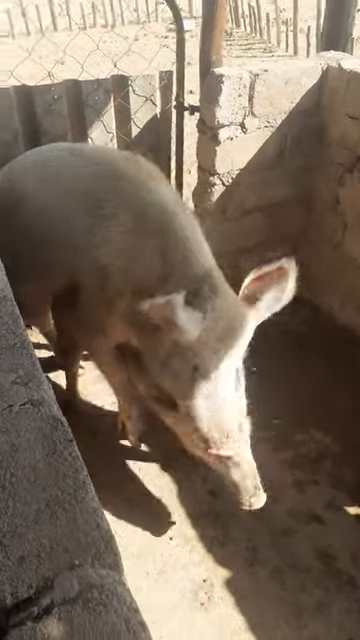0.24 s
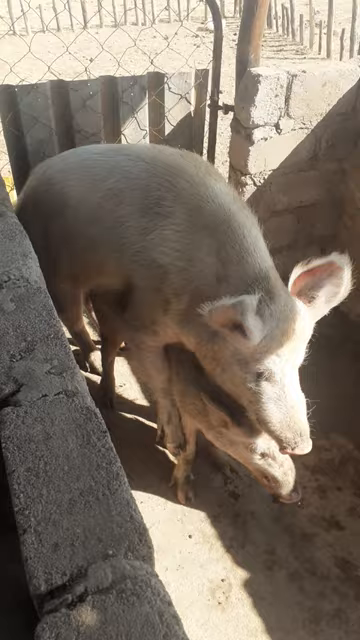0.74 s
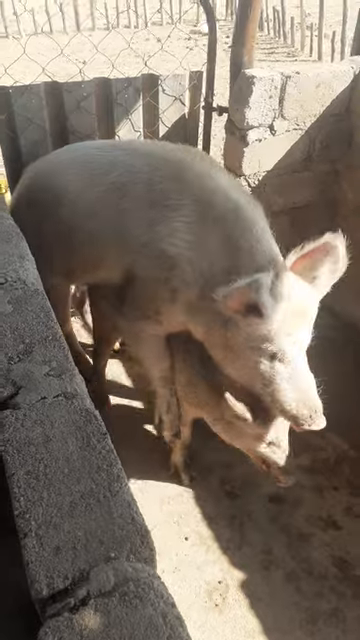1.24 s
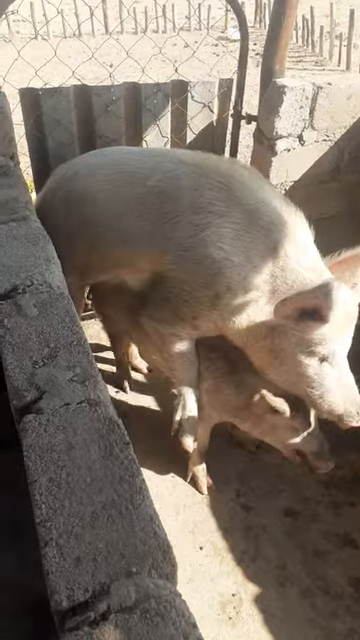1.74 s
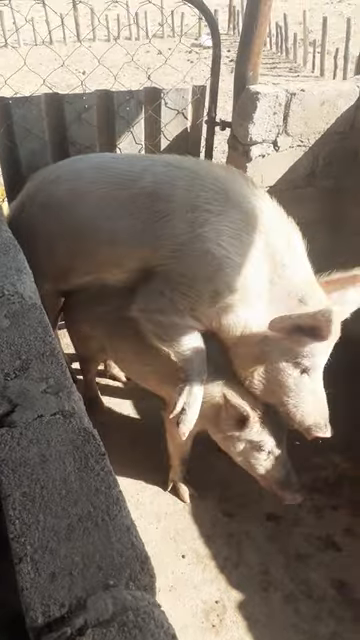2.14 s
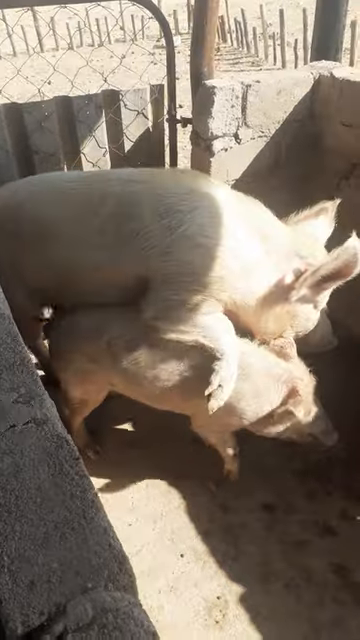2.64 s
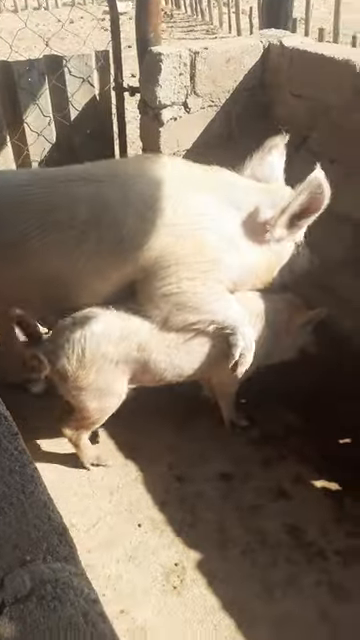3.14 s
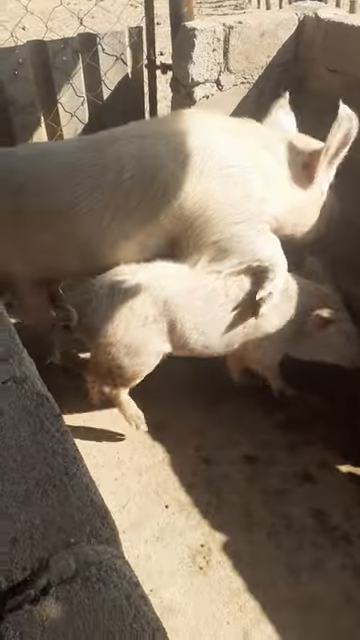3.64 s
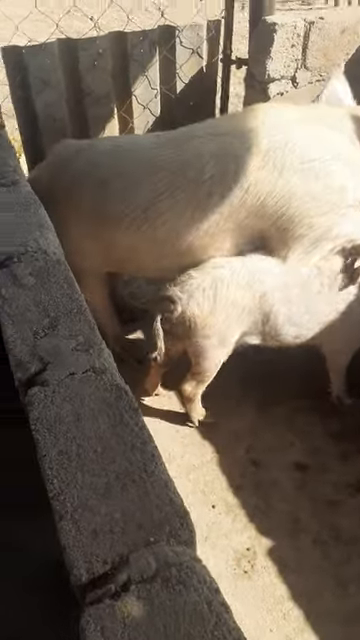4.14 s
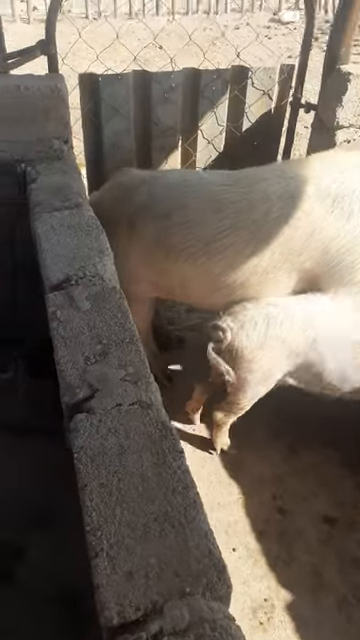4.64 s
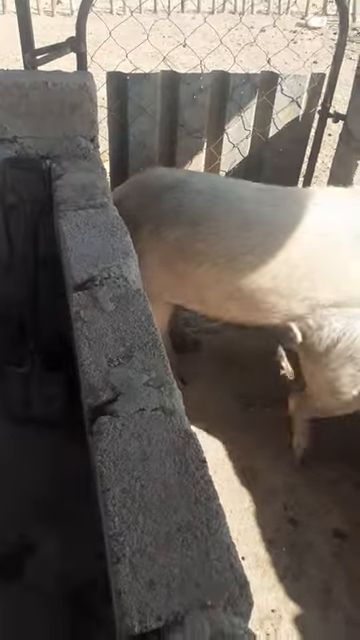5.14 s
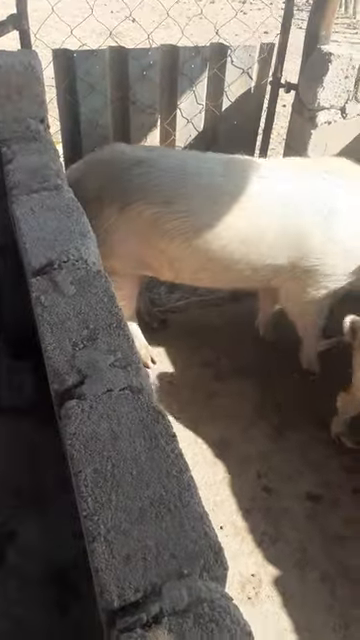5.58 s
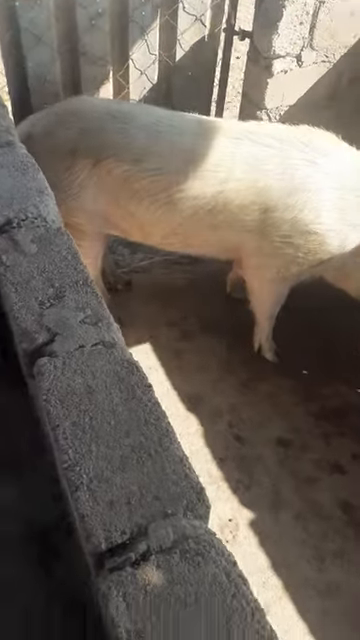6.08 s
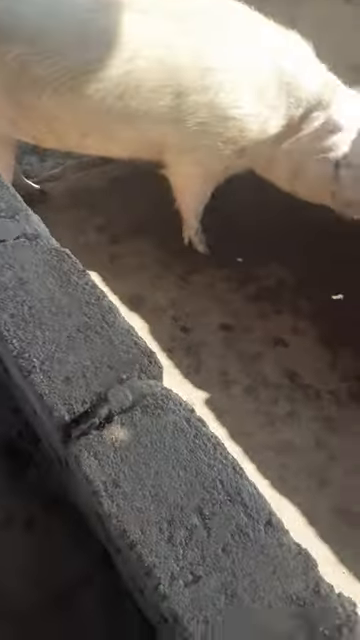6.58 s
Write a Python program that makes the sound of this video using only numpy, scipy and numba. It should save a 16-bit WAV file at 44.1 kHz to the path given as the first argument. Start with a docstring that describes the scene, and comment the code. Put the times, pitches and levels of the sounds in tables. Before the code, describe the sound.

A young pig growls and screams twice, harsh and shrill, in a concrete pen, then gives quiet low grunts and scrapes its trotters.

```python
"""Pig squabble in a pen

A young pig, pinned under a big one in a concrete pen, growls, screams twice and grunts as it gets free.
The screams are rough vocal-fold pulses plus a shrill second oscillator, shaped by a moving throat.
Grunts are slow slaps that ring snout and chest; snorts are noise through one snout resonance.
Trotters scrape and tap on the gritty floor; close walls throw it all back at a phone, over quiet air."""
import sys
import numpy as np
from scipy import signal
from scipy.fft import rfft, irfft, next_fast_len
from scipy.io import wavfile
from scipy.ndimage import uniform_filter1d, minimum_filter1d
from numba import njit

SR = 44100
rng = np.random.default_rng(int(sys.argv[2]) if len(sys.argv) > 2 else 0)


def int16_out(signal):
    """Quantize to a 16-bit WAV file."""
    q = np.round(np.clip(np.atleast_2d(signal).T, -1, 1) * 32767)
    wavfile.write(sys.argv[1], SR, q.astype(np.int16))


N = 300457
T = np.arange(N) / SR  # time of each sample, s


def undb(db):
    """Turn decibels into a gain."""
    return 10 ** (np.asarray(db) / 20)


def unit(x):
    """Scale to an rms of 1."""
    return x / np.sqrt(np.mean(x ** 2) + 1e-18)


def steady(x):
    """Even out slow swells, keeping the fast grain."""
    return x / np.sqrt(np.abs(uniform_filter1d(x ** 2, size=2600)) + 1e-12)


def curves(rows):
    """Join the columns of a table by straight lines in time."""
    start_s, *columns = np.transpose(rows)
    return [np.interp(T, start_s, column) for column in columns]


def envelope(start, end, rise_s, fall_s):
    """Swell up to the start, hold to the end, die away."""
    return np.exp(np.minimum(T - start, 0) / rise_s - np.maximum(T - end, 0) / fall_s)


def noise():
    """White noise."""
    return rng.standard_normal(N)


def walk(rate):
    """Random wander that picks a new target so many times a second."""
    return np.interp(T * rate, np.arange(N), noise())


def colour(x, points):
    """Shape the spectrum by a table of (pitch_hz, level_db)."""
    hz, db = np.transpose(points)
    size = next_fast_len(N + SR // 10)
    f = np.arange(size // 2 + 1) * SR / size
    gain = undb(np.interp(np.log(f + 1), np.log(hz), db))
    return irfft(rfft(x, size) * gain, size)[..., :N]


@njit
def svf(x, g, k):
    """State-variable band-pass: two leaky stores that pass energy to and fro."""
    y, b, l = np.empty(len(x)), 0., 0.
    for i in range(len(x)):
        v = (b + g[i] * (x[i] + 1e-18 - l)) / (1 + g[i] * (g[i] + k[i]))
        b, l, y[i] = 2 * v - b, l + 2 * g[i] * v, k[i] * v
    return y


def ring(x, hz, width):
    """A resonance whose centre may move."""
    hz = np.minimum(hz + np.zeros(len(x)), SR / 2 - 2000)
    return svf(x, np.tan(np.pi * hz / SR), width / hz)


def ring_twice(x, hz, width):
    """The same resonance passed twice, for steeper sides."""
    return ring(ring(x, hz, width), hz, width)


# Colour of the quiet outdoor air: (pitch_hz, level_db)
AIR = [(24, -38), (40, 3), (320, 8), (516, -10), (1270, -3.5), (4570, -12), (7540, -8), (16000, -76.5)]
AIR_DB = -64


def outdoor_air():
    """Coloured noise, partly shared by both channels, whose level drifts gently."""
    both_channels = noise() + 0.68 * np.array([noise(), noise()])
    return unit(colour(both_channels, AIR)) * undb(AIR_DB + 1.4 * walk(1.2))


# How wide the mouth is held: (time_s, mouth_resonance_hz)
MOUTH = [(0, 1640), (.19, 1543), (.37, 2100), (.48, 1890), (.6, 2064), (.8, 2123), (1.0, 1940), (1.1, 1859),
         (1.2, 1993), (1.66, 2100), (1.87, 1729), (2.13, 1498), (2.33, 1931), (2.55, 1611), (2.93, 1625),
         (3.17, 1826), (3.26, 1748), (3.33, 1480)]
NARROW_HZ, WIDE_HZ = 1532, 2100  # mouth resonance in a growl and in a full scream
# The wider the mouth, the louder, thinner, brighter and clearer the voice: (in a growl, in a full scream)
LOUDNESS_DB, BASS_DB, TREBLE_DB, ROUGHNESS = (-3, 5), (-8.5, -17), (-11.5, -8.5), (.74, 0.171)


def follow(ends):
    """A quality of the voice, between its values for a narrow and a wide mouth."""
    mouth_hz, = curves(MOUTH)
    return np.interp(mouth_hz, [NARROW_HZ, WIDE_HZ], ends)


# An opening growl and two screams, with settings added to those that follow the mouth:
# (start_s, end_s, level_db halfway, swell_db_per_s, bass_db, treble_db, roughness_0_to_1, open_throat_db)
SCREAMS = [(0, 0.23, -15.5, 4, 7.5, 1.5, 0.42, -3.5), (0.236, 1.847, -13.5, -1, -2, 4, 0.06, -40),
           (2.194, 3.27, -9.5, 2, -3, 2.5, 0, -19.5)]
ATTACK_S, RELEASE_S = 0.035, 0.035
# The voice breaks up: (centre_s, spread_s, level_change_db, added_roughness_0_to_1)
BREAKS = [(0.239, 0.019, 6.5, 0.23), (0.487, 0.042, -1.5, 0.54), (1.098, 0.066, -0.5, 0.3),
          (1.26, .025, -0.5, .5), (1.501, .025, 3, 0.38), (1.802, .04, 4.5, 0.12), (2.554, 0.028, -8.5, .2),
          (2.709, 0.063, -8.5, 0), (3.227, 0.071, -1, 0.2)]


def push():
    """Each cry's effort rises, holds and lets go, bringing its own tone; breaks jolt level and roughness."""
    gains = []
    for start, end, db, swell, *_ in SCREAMS:
        level_db = db + swell * (np.clip(T, start, end) - (start + end) / 2)
        gains.append(undb(level_db) * envelope(start, end, ATTACK_S, RELEASE_S))
    gains = np.array(gains)
    jolt_db, rasp = sum(np.outer([db, rough], np.exp(-((T - s) / spread) ** 2))
                        for s, spread, db, rough in BREAKS)
    # the strongest cry sets the tone
    tone = np.array(SCREAMS)[gains.argmax(axis=0), 4:].T
    bass_db, treble_db, hoarse, throat_db = (uniform_filter1d(c, size=900) for c in tone)
    effort = gains.max(axis=0) * undb(follow(LOUDNESS_DB) + jolt_db)
    return effort, bass_db, treble_db, hoarse + rasp, throat_db


# Centre line of the vocal folds' pitch: (time_s, strong_weak_pulse_pair_rate_hz)
PITCH = [(.28, 245.3), (.34, 233.5), (.45, 231.4), (.54, 222.5), (.65, 234.8), (.71, 233), (.74, 266.5),
         (1.0, 239.9), (1.1, 221.3), (1.15, 229.1), (1.19, 250), (1.31, 248.8), (1.47, 260), (1.53, 314),
         (1.56, 322), (1.6, 353.6), (1.65, 314.9), (1.72, 345.8), (1.77, 301), (1.88, 268.7), (2.19, 257.9),
         (2.29, 299.8), (2.5, 276.3), (2.62, 251.7), (2.75, 270.3), (3.03, 252.5), (3.22, 304.5),
         (3.33, 270)]
# The weak pulse catches up as the pitch climbs: (pair_rate_hz, shortfall_0_to_1)
SHORTFALL = [(270, 0.89), (320, 0.1)]


def folds(hoarse, jitter=0.03013, lurch=.055, rasp=1.78, tremor=.005, triplets=0.9):
    """Strong and weak pulses in turn; roughness makes pitch lurch, cycles break up and turbulence join in."""
    pair_hz, = curves(PITCH)
    rough = np.clip(follow(ROUGHNESS) + hoarse, 0, 1)
    shortfall = np.clip(np.interp(pair_hz, *np.transpose(SHORTFALL)), 0, 1)
    unsteadiness = tremor * walk(40) + rough * (jitter * walk(400) + lurch * walk(45))
    pulse_hz = 2 * pair_hz * (1 + unsteadiness)
    phase = np.cumsum(pulse_hz) / SR
    cycle = np.round(phase).astype(int)
    offset = (phase - cycle) * SR / pulse_hz  # samples from the nearest closure
    pulses = np.sinc(offset) * np.exp(-(offset / 4) ** 2)
    pulses *= 1 - shortfall * (cycle % 2)
    pulses *= undb(6 * rough * np.tanh(noise()[cycle]))  # a random level for each cycle
    # strained folds slip in and out of beating in threes
    pulses *= 1 + triplets * np.sqrt(rough) * walk(16) * np.cos(2 * np.pi * cycle / 3)
    turbulence = noise() * (1 + np.cos(2 * np.pi * phase))
    return steady(pulses) + rasp * rough ** 2 * steady(turbulence), phase, rough


# Upper throat resonances: (multiple_of_mouth_resonance, width_hz of each of two passes, level_db)
UPPER = [(1.95, 667, 6.5), (2.401, 617, 5), (2.998, 1014, 3.5), (4.0, 1255, -4)]
QUIVER = .035  # how much the mouth trembles in a scream, as a share of its resonance


def screams(mouth_db=-1, leak_db=-14, leak_rough_db=-10, mouth_width_hz=620, spread=1.05):
    """The folds drive low resonances and a stack of high ones that rise as the mouth opens."""
    mouth_hz, = curves(MOUTH)
    effort, bass_db, treble_db, hoarse, throat_db = push()
    source, phase, rough = folds(hoarse)
    mouth_hz = mouth_hz * (1 + QUIVER * walk(25.01))
    low = ring(ring(source, 548, 240), 527, 730)
    low += undb(-12.5) * rough ** 2 * ring(source, 210, 300)
    throat = ring_twice(source, 1150, 400)
    width = mouth_width_hz * (1 + spread * rough ** 2)  # a rasping throat damps the resonance
    mouth = ring(ring_twice(source, mouth_hz, width), mouth_hz, 2 * width)
    upper = sum(undb(d) * ring_twice(source, k * mouth_hz, w) for k, w, d in UPPER)
    # air hisses past the teeth, most in a clear scream
    hiss = ring(ring(noise() * undb(2 * walk(34)), 11000, 6000), 12000, 7100)
    upper += undb(leak_db + leak_rough_db * rough) * hiss
    whistle = shrill(phase, follow(ROUGHNESS))
    # the whistle takes its power out of the folds
    whistle_power = uniform_filter1d(whistle ** 2, size=1500)
    share = np.clip(1 - whistle_power / (effort ** 2 + 1e-12), .22, 1)
    bright = undb(mouth_db) * steady(mouth) + undb(follow(TREBLE_DB) + treble_db) * steady(upper)
    voice = np.sqrt(share) * bright
    voice += share ** 0.39 * undb(follow(BASS_DB) + bass_db) * steady(low)
    voice += undb(throat_db) * steady(throat)
    rumble = undb(-33) * rough * unit(ring(noise(), 110, 110))
    return (voice + rumble) * effort + whistle + hoot()


# The voice breaks into a whistle: (start_s, end_s, level_db, overtones_db)
WHISTLES = [(0.365, 0.412, -8.5, 2.5), (0.643, 0.769, -9, 1), (0.821, 0.879, -8.5, -4),
            (1.011, 1.13, -16, -2.5), (1.186, 1.22, -14, -2.5), (1.32, 1.443, -11, -8),
            (1.525, 1.729, -7.5, -4), (1.775, 1.853, -7, 0), (2.197, 2.216, -11, 3), (2.27, 2.48, -12.5, 5),
            (3.013, 3.06, -11, -3), (3.09, 3.19, -4.5, 0), (3.21, 3.275, -11, 3)]
WHISTLE_RISE_S, WHISTLE_FALL_S = 0.02, .014
# Centre line of the whistle's pitch: (time_s, pitch_hz)
WHISTLE_PITCH = [(.36, 1845), (.78, 1865), (.81, 2340), (.89, 2280), (1.0, 1665), (1.13, 1570),
                 (1.18, 2020), (1.24, 1950), (1.44, 2030), (1.51, 1900), (1.6, 1940), (1.73, 1920),
                 (1.76, 1805), (1.81, 1760), (1.87, 1630), (2.19, 1500), (2.3, 1830), (2.4, 1740),
                 (2.48, 1610), (2.99, 1310), (3.05, 1450), (3.11, 1615), (3.19, 1550), (3.26, 1520),
                 (3.32, 1200)]


def shrill(fold_phase, rough, jitter=0.0271, wander=0.004975, sidebands=0.11, upper_sideband=0.19,
           overtones_db=(-16, -21, -22)):
    """A whistling second oscillator, shaken by the folds into sidebands, the upper one strongest."""
    hz, = curves(WHISTLE_PITCH)
    gains = np.array([undb(db) * envelope(start, end, WHISTLE_RISE_S, WHISTLE_FALL_S)
                      for start, end, db, _ in WHISTLES])
    bright_db = np.array(WHISTLES)[gains.argmax(axis=0), -1]
    unsteadiness = jitter * rough * walk(500) + wander * walk(60)
    phase = 2 * np.pi * np.cumsum(hz * (1 + unsteadiness)) / SR
    overtones = sum(undb(d) * np.sin((k + 2) * phase) for k, d in enumerate(overtones_db))
    tone = np.sin(phase) + undb(bright_db) * overtones
    tone += upper_sideband * np.sin(phase + 2 * np.pi * fold_phase)
    shake = (1 + sidebands * np.cos(2 * np.pi * fold_phase)) * undb(3.8 * walk(110))
    return unit(tone * shake) * gains.max(axis=0)


# One low harmonic rings out: (start_s, end_s, level_db, harmonic_of_pair_rate)
HOOTS = [(0.558, 0.614, -21.5, 3), (1.529, 1.777, -27, 2), (2.243, 2.445, -23, 2), (2.704, 2.914, -21, 2),
         (3.2, 3.305, -25, 2)]


def hoot(jitter=0.0618, flutter_db=7.0):
    """A low harmonic of the folds rings out as a hollow tone under the rasp."""
    pair_hz, = curves(PITCH)
    rough = follow(ROUGHNESS)
    phase = 2 * np.pi * np.cumsum(pair_hz * (1 + jitter * rough * walk(200))) / SR
    tones = sum(undb(db) * envelope(start, end, WHISTLE_RISE_S, WHISTLE_FALL_S) * np.sin(round(k) * phase)
                for start, end, db, k in HOOTS)
    return np.sqrt(2) * tones * unit(undb(flutter_db * rough * walk(70)))


# Grunts, levels relative: (start_s, length_s, average_slaps_per_s, level_db, fall_db over the length,
# chest_db, lowest_resonance_hz, mouth_db, mouth_at_start_hz, mouth_at_end_hz, nostrils_db)
GRUNTS = [(2.054, 0.044, 58.2, -30.5, -5.5, -17, 501, -8.5, 1434, 1270, -12),
          (2.091, 0.08, 55, -28.5, 4, -10.5, 425, 3.5, 1430, 1220, -7.5),
          (3.525, 0.032, 120, -39.5, 11, -13.5, 442.4, 3.5, 1521, 1445, -9),
          (3.556, 0.15, 52, -36, 20, 2, 340.2, 5.5, 1530, 1130, -4),
          (3.73, 0.086, 61, -39, 6, -4.5, 288, 6, 1029, 943, -13),
          (3.85, 0.15, 49.5, -32.5, -6.5, 1.5, 506, -4.5, 1600, 1556, -12.5),
          (4.156, 0.18, 50, -32.5, 16.5, -2.5, 351, -6, 1450, 1010, -14.5),
          (4.681, 0.071, 47.4, -33, -9, -8, 323.5, 3, 1880, 1210, -7),
          (5.652, 0.058, 70, -43.5, -8, 7, 518, -9, 1750, 1470, -19),
          (6.363, 0.11, 47, -33, 1.5, -6, 324, -26, 990, 1000, -33)]
# Snout resonances with the mouth nearly shut: (pitch_hz, width_hz of the first pass, level_db)
SNOUT = [(747, 57, -8), (990, 55, -7.5), (1249, 57, -17), (1993, 51, -10)]
# Nasal passages with the mouth nearly shut: (pitch_hz, width_hz of the first pass, level_db)
NOSTRILS = [(2730, 190, -1.5), (2966, 170, 0), (3920, 880, -8.5)]
SHUT_HZ = 1060  # mouth resonance when nearly shut
CLOSING_S, FLAP = .032, .035  # how fast the mouth closes, and the turbulence after each slap


def grunt(start, length, rate, db, fall_db, chest_db, low_hz, mouth_db, open_hz, closed_hz, nostril_db,
          glide=0.15, release_s=0.041, first=0.8, breath_db=-39, breath_s=0.051, snout_db=0, darken=0.82,
          spit_db=-24):
    """Slow slaps of slack folds ring snout and chest; the resonances follow the mouth as it moves."""
    t = np.arange(SR // 2) / SR
    beats = np.arange(0, length * rate)
    unevenness = .08 * (beats > 2) * rng.standard_normal(len(t))[:len(beats)]
    times = (beats + unevenness) / rate
    strength = undb(-fall_db * times / length) * np.clip((length - times) / release_s, 0, 1)
    slaps = np.zeros(len(t))
    slaps[(times * SR).astype(int)] = strength * np.where(beats == 0, first, 1)
    flapping = signal.lfilter([1], [1, -np.exp(-1 / (.008 * SR))], slaps)
    source = slaps + FLAP * flapping * rng.standard_normal(len(t))
    # breath swells towards the end of the grunt and fades after it
    breath = np.exp(-np.abs(t - length) / breath_s) * rng.standard_normal(len(t))
    source += undb(breath_db) * np.abs(slaps).max() * breath
    mouth_hz = closed_hz + (open_hz - closed_hz) * np.exp(-t / CLOSING_S)
    gape = mouth_hz / SHUT_HZ
    lift = gape ** glide
    snout, nostrils = (sum(undb(d) * unit(ring(ring(source, hz * lift, w), hz * lift, 4 * w))
                           for hz, w, d in modes) for modes in (SNOUT, NOSTRILS))
    # a narrower mouth is also quieter
    mouth = unit(ring(ring(source, mouth_hz, 340), mouth_hz, 770) * gape ** darken)
    mouth += undb(spit_db) * unit(ring_twice(source, 4200, 3100))
    # the lowest throat resonance carries the vowel; the chest booms under it
    throat = unit(ring(ring(source, low_hz, 55), low_hz, 260))
    chest = unit(ring(ring(slaps, 110, 12), 52, 68))
    sound = throat + undb(snout_db + mouth_db / 2) * snout + undb(mouth_db) * mouth
    sound += undb(nostril_db) * nostrils + undb(chest_db) * chest
    sound = sound * undb(db) * np.sqrt(length / t[-1])
    return np.pad(sound, (int(start * SR), N))[:N]


# Air forced through the snout: (start_s, end_s, level_db, pitch_hz, width_hz of each of two passes)
SNORTS = [(3.678, 3.715, -44, 3070, 330), (3.837, 3.965, -38.5, 1890, 1110), (6.66, 6.77, -41, 600, 260)]


def snorts(rise_s=.02, fall_s=.025):
    """Breath rushes through one resonance of the snout."""
    return sum(undb(db) * envelope(start, end, rise_s, fall_s) * unit(ring_twice(noise(), hz, width))
               for start, end, db, hz, width in SNORTS)


# A trotter drags over the floor, levels relative: (time_s, decay_s, level_db, gritty_treble_db)
SCRAPES = [(4.48, 0.31, -50, -27.5), (4.622, 0.18, -57, -4.5), (5.173, 0.18, -54.5, -9),
           (5.275, 0.033, -42.5, -33), (5.754, 0.17, -44, -17), (5.974, 0.36, -37, -13),
           (6.199, 0.13, -30, -13), (6.615, 0.99, -41, -11.5)]
# Colour of the grains before bass and treble are levelled apart: (pitch_hz, level_db)
SCRAPE_COLOUR = [(35, -52.5), (60, -19), (294, -2.5), (720, -8.5), (946, -7), (1660, -8.5), (2130, -6.5),
                 (3270, -20.5), (4320, -15), (6580, -16), (9570, -38), (12400, -24.5), (16000, -31)]
SCRAPE_RISE_S, GRIT_FADE_S, SHUFFLE_DB = 0.016, 0.035, -60.5  # the shuffle level is relative too


def scraping(body_db=-3, grit_db=0, bite=2.2):
    """Trotters drag on sandy concrete: dense grains, brightest as the hoof bites, over a faint shuffle."""
    drag, grit = undb(SHUFFLE_DB), undb(SHUFFLE_DB - 10.0)
    for s, decay, db, bright_db in SCRAPES:
        stroke = undb(db) * envelope(s, s, SCRAPE_RISE_S, decay)
        biting = 0.57 + bite * envelope(s, s, SCRAPE_RISE_S, GRIT_FADE_S)
        drag = np.hypot(drag, stroke)
        grit = np.hypot(grit, stroke * undb(bright_db) * biting)
    grains = colour(noise() * undb(2.0 * noise() + 1.0 * walk(110)), SCRAPE_COLOUR)
    body, treble = (signal.sosfilt(signal.butter(4, 3500, kind, fs=SR, output="sos"), grains)
                    for kind in ("low", "high"))
    return undb(body_db) * drag * unit(body) + undb(grit_db) * grit * unit(treble)


# Trotter taps, levels relative: (time_s, click_db, thud_db)
TAPS = [(6.214, -36, -32), (6.3883, -26.5, -24.5), (6.4917, -23, -30.5), (6.54, -29, -34),
        (6.6132, -45, -27)]


def taps(click_db=-3, thud_db=-3, click_s=0.00045, thud_s=0.0096):
    """A hoof lands: a hard tick and a dull thud, each a fading burst of ringing noise."""
    tick = unit(ring(noise(), 2400, 1600))
    thud = unit(ring(ring(noise(), 315, 140), 320, 340))
    out = 0
    for s, db, low_db in TAPS:
        age = np.maximum(T - s, 0)
        hard = undb(db + click_db) * tick * np.exp(-age / click_s)
        dull = undb(low_db + thud_db) * thud * np.exp(-age / thud_s)
        out = out + (T >= s) * (hard + dull)
    return out


# How much stronger the left port is than the right: (pitch_hz, difference_db)
PORTS = [(100, -4), (700, -1), (1400, -7), (3000, -1.5), (6000, 0.5), (8500, -23.5), (10500, 2),
         (14000, -5.5)]


def pen(x, early_db=0.0, early_t60=0.072, tail_db=-24, tail_t60=0.4, lag_s=.00009):
    """Near walls give a dense short slap that shifts as the pigs move; sound reaches the right port first."""
    t, ears = np.arange(SR // 2) / SR, []
    for delay, side in ((lag_s, 1), (0, -1)):  # left, right
        direct = np.sinc((t - delay) * SR - 8) * (t < .001)
        tail = ring(rng.standard_normal(len(t)) * undb(-60 * t / tail_t60), 2100, 2400)
        ear = signal.oaconvolve(x, direct + undb(tail_db) * unit(tail) / np.sqrt(len(t)))[:N]
        turn = 2 * np.pi * T + walk(2.75)  # blends two sets of echoes
        for weight in (np.cos(turn), np.sin(turn)):
            # rough blocks scatter the treble most
            early = ring(rng.standard_normal(len(t)) * undb(-60 * t / early_t60), 2810, 19000)
            echoes = signal.oaconvolve(x, unit(early) / np.sqrt(len(t)))[:N]
            ear += undb(early_db) * weight * echoes
        ears.append(colour(ear, [(hz, side * db / 2) for hz, db in PORTS]))
    return np.array(ears)


# Microphone colour on the voice: (pitch_hz, level_db)
MIC = [(40, -14.5), (100, -2), (330, 3.5), (420, -1.5), (690, 0.5), (880, -4), (1100, -1.5), (1900, -3),
       (2400, -2.5), (2850, -4), (3400, -0.5), (8300, -4.5), (9300, -19.5), (10200, -14), (12000, -5),
       (15500, 12.5)]


def scene(scream_db=-3, grunt_db=-3):
    """Screams, grunts, snorts and the footwork in the pen, over quiet outdoor air."""
    grunts = sum(grunt(*row) for row in GRUNTS)
    voice = undb(scream_db) * screams() + undb(grunt_db) * grunts + snorts()
    return pen(colour(voice, MIC) + scraping() + taps()) + outdoor_air()


TOP_HZ = 15900  # highest pitch kept


def record(dry):
    """The phone's limiter holds the peaks at full scale; then the top is cut."""
    gain = 1 / np.maximum(np.abs(dry).max(axis=0), 1)
    gain = uniform_filter1d(minimum_filter1d(gain, size=301), size=301)
    return signal.sosfilt(signal.ellip(10, .2, 80, TOP_HZ, fs=SR, output="sos"), dry * gain)


dry = scene()
out = record(dry)
int16_out(out)
```